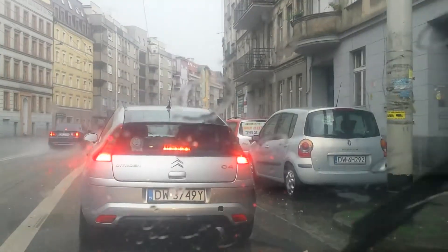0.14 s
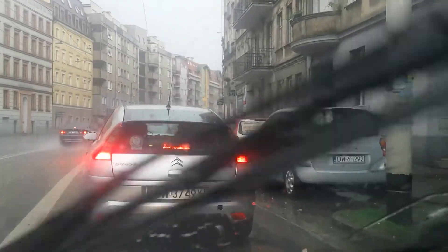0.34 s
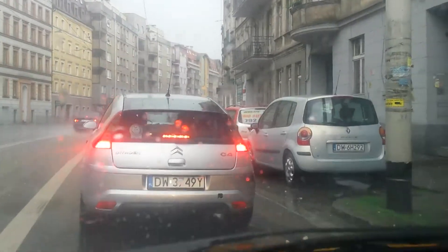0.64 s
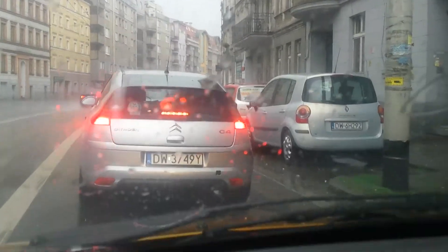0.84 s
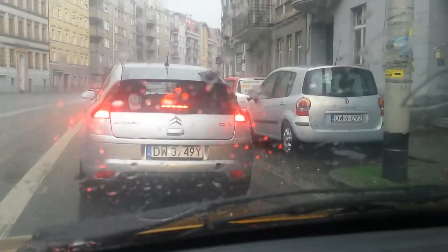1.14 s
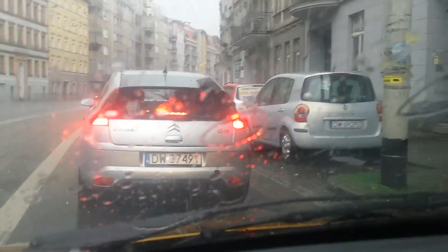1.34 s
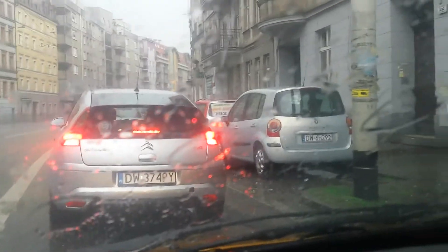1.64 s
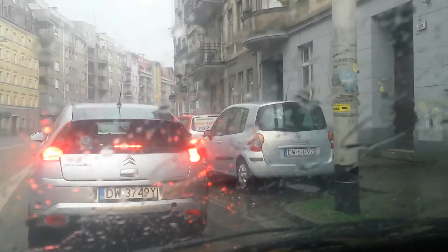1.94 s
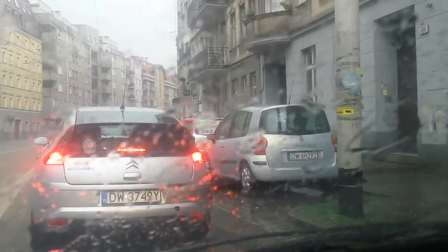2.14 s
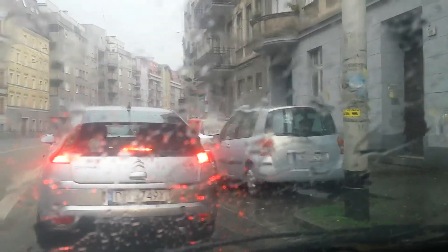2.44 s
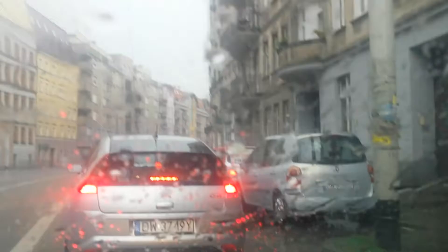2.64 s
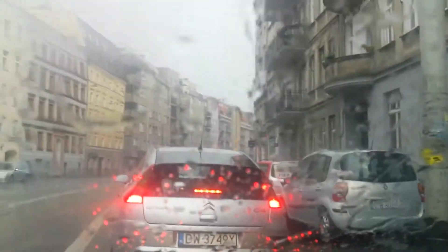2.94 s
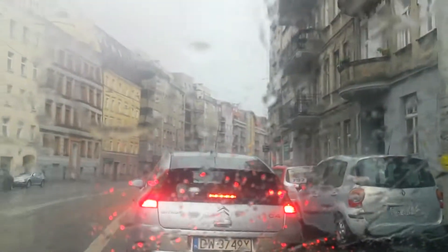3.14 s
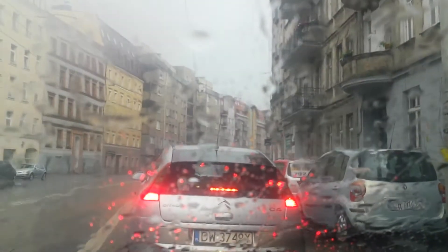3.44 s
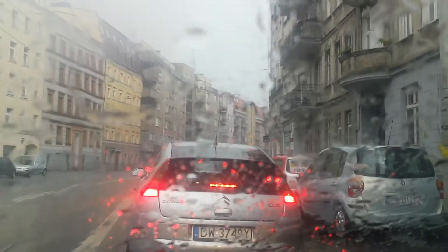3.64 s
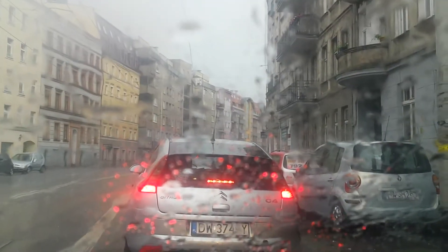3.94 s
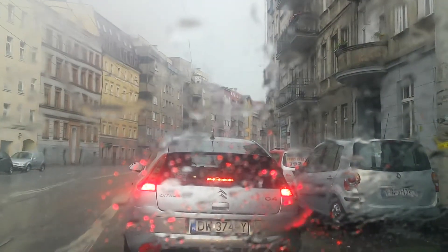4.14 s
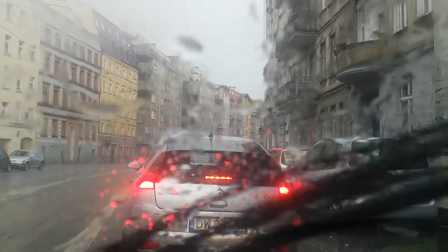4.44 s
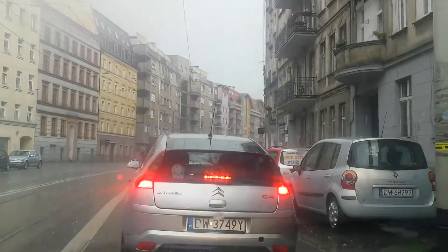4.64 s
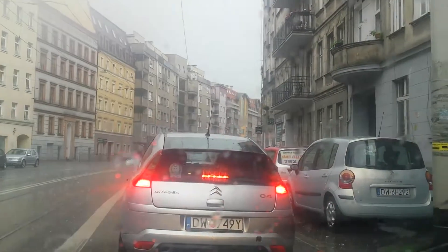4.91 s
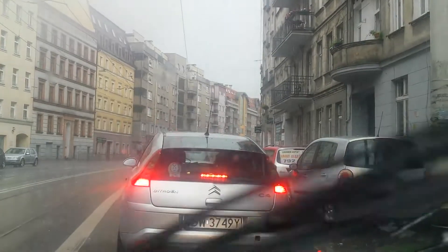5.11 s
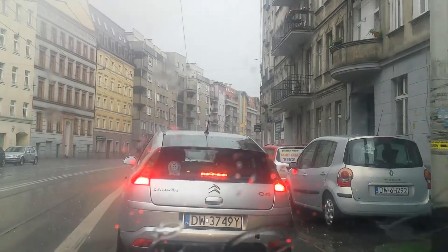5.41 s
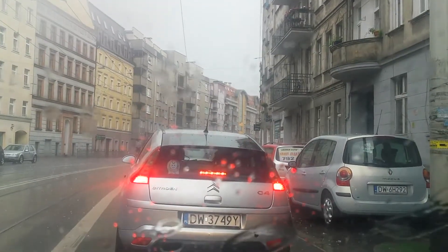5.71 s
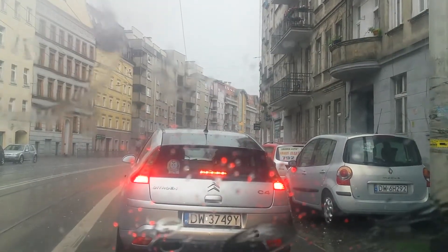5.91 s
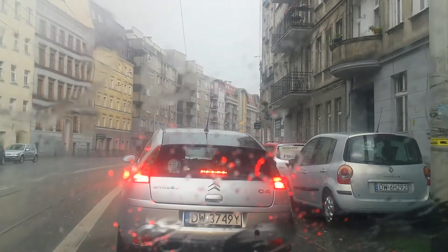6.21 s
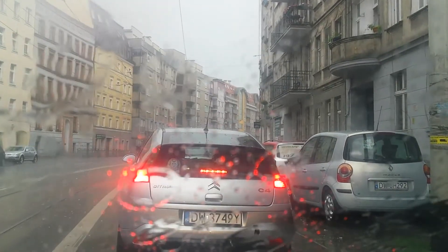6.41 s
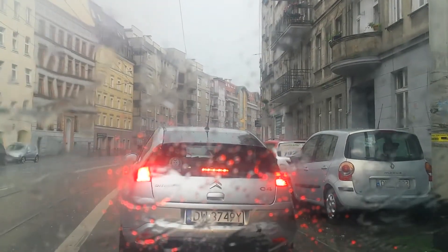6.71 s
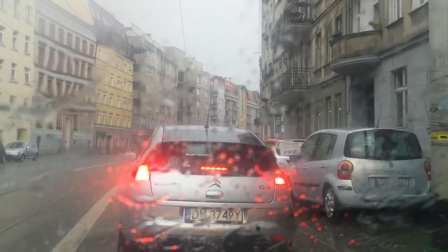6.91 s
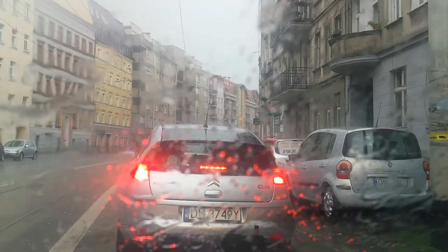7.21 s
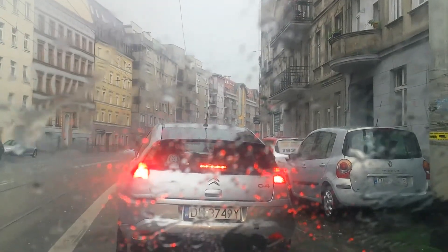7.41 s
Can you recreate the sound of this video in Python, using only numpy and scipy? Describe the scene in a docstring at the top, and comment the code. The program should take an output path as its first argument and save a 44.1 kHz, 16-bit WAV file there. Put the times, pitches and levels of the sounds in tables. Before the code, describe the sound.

Inside an idling car, steady rain hisses on the glass while hailstones crack and knock sharply on windscreen and roof, with occasional soft wiper thumps.

```python
"""Rain and hail on a car that idles in a queue, heard from inside the cabin for about 7.5 seconds.
From the start, shaped noise hisses and patters as rain, and a few low sine tones hum as the engine.
Hail begins at once: each stone is a spray of noise, a knock on the windscreen and a ringing roof.
A wiper thumps, a low decaying tone, just after the start; two more thumps come after 4.7 s.
The rain weakens and swells several times, and is strong again from about 6.8 s to the end."""
import sys
import numpy as np
from scipy import signal
from scipy.fft import rfft, irfft, next_fast_len
from scipy.io import wavfile
from scipy.ndimage import uniform_filter1d, map_coordinates

SR = 44100
rng = np.random.default_rng(int(sys.argv[2]) if len(sys.argv) > 2 else 0)


def output_pcm(signal):
    """Save a mono or channel-first signal as 16-bit PCM at the path in sys.argv[1].

    Samples are clipped to [-1, 1] before scaling.
    """
    pcm = np.clip(np.atleast_2d(signal).T, -1, 1) * 32767
    wavfile.write(sys.argv[1], SR, np.round(pcm).astype(np.int16))


N = 333396


def amp(db):
    """Turn decibels into a gain."""
    return 10 ** (np.asarray(db) / 20)


def unit(x):
    """Scale x to an rms of 1."""
    return x / np.sqrt(np.mean(x ** 2) + 1e-20)


def burst(x):
    """Scale a short sound to the energy of 20 ms at rms 1, whatever its length."""
    return unit(x) * np.sqrt(.02 * SR / x.shape[-1])


def along(points, hz):
    """Read a curve of (Hz, value) points on a logarithmic pitch axis."""
    point_hz, value = np.transpose(points)
    return np.interp(np.log(hz + 1), np.log(point_hz + 1), value)


def curves(rows):
    """Turn each column after the time into one value per sample."""
    seconds, *columns = np.transpose(rows)
    return [np.interp(np.arange(N) / SR, seconds, column) for column in columns]


def wobble(rate):
    """Draw a smooth random curve with this many random points a second."""
    points = rng.standard_normal(int(N * rate / SR) + 4)
    return map_coordinates(points, [np.arange(N) * rate / SR])


def add(track, s, sound):
    """Mix a sound into the track from time s in seconds."""
    part = track[:, max(0, round(s * SR)):][:, :sound.shape[-1]]
    part += sound[:, :part.shape[-1]]


def panned(x, left_db):
    """Make left louder than right by left_db, half on each side."""
    return x * amp(np.array([[.5], [-.5]]) * left_db)


# How alike the two ears are. Each row: pitch in Hz, likeness (1 = same, 0 = unrelated).
LIKENESS = [(100, 1), (250, 0.92), (500, 0.82), (1000, 0.031), (10000, 0.096)]
# Which side is louder. Each row: pitch in Hz, left level minus right level in dB.
LEFT_RIGHT = [(60, -3.5), (160, -3.5), (600, -2.5), (1800, -3.5), (3500, 0.5), (6300, 0.6), (11000, -10)]


def coloured(pair, spectrum, bright_db=0, ripple_db=0):
    """Filter two unrelated signals into left and right; no sound comes before its cause."""
    n = pair.shape[-1]
    m = 2 * next_fast_len(n // 2 + 1024)
    hz = np.fft.rfftfreq(m, 1 / SR)
    tilt = bright_db * along([(2800, -0.47), (7500, 0.47)], hz)
    # each spot on the car favours its own resonances
    ripple = ripple_db * map_coordinates(rng.standard_normal(128), [np.sqrt(hz / 2)])
    gain = amp(along(spectrum, hz) + tilt + ripple)
    # folding the cepstrum forward in time makes the filter start promptly (minimum phase)
    cepstrum = irfft(np.log(gain))
    cepstrum[1:m // 2] *= 2
    cepstrum[m // 2 + 1:] = 0
    colour = np.exp(rfft(cepstrum))
    # the shared middle and the opposed side part are mixed to give the wanted likeness
    turn = np.arccos(np.clip(along(LIKENESS, hz), -1, 1)) / 2
    mid, side = rfft(pair, m) * colour * [np.cos(turn), np.sin(turn)]
    ears = np.array([mid + side, mid - side])
    return irfft(panned(ears, along(LEFT_RIGHT, hz)))[:, :n]


# Tones of the idling car. Each row: pitch in Hz, rms level in dB before wavering and panning.
IDLE_TONES = [(28.4, -53.5), (50.5, -60), (56.7, -47)]


def idle(waver_db=1.5):
    """Steady low tones of the idling car hum together, wavering slowly in level and phase."""
    t = np.arange(N) / SR
    tones = np.zeros(N)
    for hz, db in IDLE_TONES:
        level = amp(db + waver_db * wobble(1.97))
        tones += level * np.sin(2 * np.pi * hz * t + 0.069 * wobble(1.26))
    return panned(np.sqrt(2) * tones, -1.7)  # a sine of peak sqrt(2) has rms 1


def patter(flutter_db):
    """Noise of countless small drops, fluttering in strength."""
    return amp(flutter_db * (wobble(25) + wobble(120))) * rng.standard_normal((2, N))


# Strength of the rainfall. Each row: time in seconds, hiss on the glass in dB,
# drumming on the panels in dB; both before the trims in rain().
RAINFALL = [(0.0, -49.5, -35.5), (0.46, -47.5, -36.5), (0.67, -53.5, -40.5), (1.03, -50, -45),
            (1.58, -54, -44), (3.14, -47.5, -38.5), (3.41, -54, -44), (4.15, -56, -44.5), (5.35, -49, -38),
            (5.91, -53.5, -43.5), (6.44, -51.5, -40.5), (6.8, -44, -35), (7.56, -44.5, -36.5)]
# Colour of the hiss. Each row: pitch in Hz, relative level in dB per Hz.
HISS_COLOUR = [(800, -32), (1300, -52), (2000, -13.5), (2700, -5), (4500, -5.5), (6500, -8), (8500, -19),
               (11800, -30.5), (13000, -46)]
# Colour of the windscreen, also used for the panels. Each row: pitch in Hz, relative dB per Hz.
GLASS_COLOUR = [(150, -20.5), (330, -7.5), (470, -2.5), (540, -1.5), (630, 5), (700, -0.5), (760, 0.5),
                (900, -5), (1070, 1.5), (1220, -6.5), (1400, -6.5), (1650, -10.5), (2200, -15.5),
                (5000, -56.5)]
# Colour of the cabin's rumble. Each row: pitch in Hz, relative level in dB per Hz.
CABIN_COLOUR = [(15, -46), (35, -15), (70, 0), (100, -10.5), (140, 5), (165, -3.5), (190, 2), (250, -1.5),
                (330, -7), (500, -14), (1200, -75.5)]


def rain(hiss_db=3.4, drum_db=1, rumble_db=-39, rumble_grows=0.94):
    """Drops hiss on the glass and drum on the panels; the cabin's rumble follows the drumming."""
    hiss, drum = curves(RAINFALL)
    rumble = rumble_db + rumble_grows * (drum - drum.mean())
    fizz = unit(coloured(patter(flutter_db=4.0), HISS_COLOUR))
    panels = unit(coloured(patter(flutter_db=2.84), GLASS_COLOUR))
    cabin = unit(coloured(patter(flutter_db=1.5), CABIN_COLOUR))
    return amp(hiss + hiss_db) * fizz + amp(drum + drum_db) * panels + amp(rumble) * cabin


# Moments when the wipers turn round. Each row: start in seconds, level in dB before panning.
WIPER_TURNS = [(0.079, -22.5), (4.786, -21.5), (5.33, -36)]


def wipers(thump_hz=123, rise_s=0.032):
    """The rubber blades flip over with a soft, low thump that swells and fades."""
    out, t = np.zeros((2, N)), np.arange(SR // 4) / SR
    swell = (t / rise_s * np.exp(1 - t / rise_s)) ** 3  # peaks at rise_s
    thump = np.sin(2 * np.pi * thump_hz * t) * swell
    for s, db in WIPER_TURNS:
        add(out, s, amp(db) * panned(thump, -4))
    return out


def strike(t, rise, t60):
    """Envelope that builds while the ice crushes, then falls by 60 dB in t60 seconds."""
    rise = max(rise, 1e-4)
    return np.minimum(t / rise, 1) * amp(-60 * np.maximum(t - rise, 0) / t60)


# Colour of the spray. Each row: pitch in Hz, relative level in dB per Hz.
SPRAY_COLOUR = [(500, -13.5), (1300, -6), (1900, -6.5), (2500, -0.5), (3400, -1.5), (5200, 0),
                (5650, -10.5), (6300, -0.5), (7200, -5.5), (8500, -12.5), (11800, -22), (12500, -16)]


def shatter(t, crush, t60, bright_db, crack=0.099, grain_db=3.5, clump_db=2, tail_db=-22, tail_t60=0.13):
    """Ice or water cracks and scatters in clumps of fragments; the cabin prolongs it a little."""
    fine, coarse = rng.standard_normal((2, len(t)))
    grains = grain_db * unit(uniform_filter1d(fine, size=30))
    clumps = clump_db * unit(uniform_filter1d(coarse, size=220))
    fragments = amp(grains + clumps)
    snap = crack * np.exp(-((t - crush) / 0.00037) ** 2)
    tail = amp(tail_db) * strike(t, crush, tail_t60)
    splash = snap + strike(t, crush, t60) + tail
    noise = rng.standard_normal((2, len(t))) * fragments * splash
    return burst(coloured(noise, SPRAY_COLOUR, bright_db, ripple_db=2.5))


def drops(drop_db=-49, spread_db=2.0, bright_db=3, t60=0.091, count=260):
    """Raindrops of all sizes splash on the windscreen at random times."""
    out, t = np.zeros((2, N)), np.arange(SR // 14) / SR
    hiss = curves(RAINFALL)[0]
    heavier_db = hiss - hiss.mean()  # the drops grow as the rain swells
    chances = rng.random((count, 2))
    sizes = rng.standard_normal((count, 2)).clip(-2, 2)
    for (when, softness), (bright, loud) in zip(chances, sizes):
        tick = shatter(t, 0.0016 + 0.0085 * softness, t60, bright_db + 3 * bright)
        level_db = drop_db + heavier_db[int(when * N)] + spread_db * loud
        add(out, when * N / SR, amp(level_db) * tick)
    return out


# the glass rings for KNOCK_T60_S under a stone that barely booms, longer under a heavier one
FAINT_BOOM_DB, KNOCK_T60_S, RING_DB_PER_DB = -58, .13, 0.04


def knock_on_glass(t, crush, boom):
    """A blow of noise swells and dies in the colour of the windscreen."""
    weight_db = boom - FAINT_BOOM_DB
    t60 = KNOCK_T60_S * amp(RING_DB_PER_DB * weight_db)
    blow = rng.standard_normal((2, len(t))) * strike(t, crush + 0.0019, t60)
    return burst(coloured(blow, GLASS_COLOUR, ripple_db=2.5))


# Ringing pitches (modes) of the roof panel. Each row: pitch in Hz, relative level in dB before
# the focus around BOOM_HZ, time to fall by 60 dB in seconds.
ROOF_MODES = [(93, -4, 0.15), (123, -7, 0.68), (139.1, -2.5, 0.54), (165, 2.5, 0.19), (187.4, 4, 0.27),
              (219.5, 1.5, 0.23), (241.7, -2, 0.62), (257.8, 2.5, 0.33), (285.2, 1.5, 0.36)]
BOOM_HZ = 182  # the roof answers most near this pitch


def boom_of_roof(t, crush, focus_db, width):
    """The roof modes ring as decaying sines, with new strengths and phases for each stone."""
    hz, mode_db, mode_t60 = np.transpose(ROOF_MODES)[:, :, None]
    # the place of impact sets the strengths and phases
    loud, phase, spread = rng.standard_normal((3, len(ROOF_MODES), 1))
    focus = focus_db * np.log2(hz / BOOM_HZ) ** 2
    strength = amp(mode_db - focus + 2 * loud - 60 * t / mode_t60)
    apart = width * spread * (hz / hz.max()) ** 2  # higher modes differ more between the microphones
    turns = hz * t + phase
    roof = np.array([(strength * np.sin(2 * np.pi * turns + side * apart)).sum(0) for side in (1, -1)])
    return panned(burst(roof * np.minimum(t / (crush + 0.012), 1)), -3.0)


# The hailstones. Each row: start in seconds, spray in dB, brightness of the spray in dB,
# windscreen knock in dB, roof boom in dB, crush time in seconds.
# The levels and the brightness are before the trims in hail().
HAILSTONES = [(0.037, -18, -0.5, -18, -18.5, 0.0018), (0.2647, -27, 3, -28.5, -25, 0.0093),
              (.382, -30.5, -4.5, -26, -55, 0.00093), (.5154, -18, -3, -22, -24, 0.0031),
              (0.5725, -19, -1.5, -35.5, -26, 0.0033), (0.7955, -9.5, -14.5, -17, -11.5, 0.0013),
              (0.888, -33.5, 2, -46, -53, 0.0031), (0.922, -29.5, 0, -50, -52, 0.01),
              (.9486, -24.5, 3, -55, -53, 0.0013), (.981, -14.5, 12, -29.5, -30.5, 0.0047),
              (1.0265, -27.5, 1, -50, -52, 0.0057), (1.0907, -32, -5, -25.5, -28.5, 0.0025),
              (1.19, -33, -2, -39, -52, 0.0078), (1.2323, -23, 10, -52, -44, 0.0027),
              (1.256, -30.5, -3, -54, -49, 0.0061), (1.365, -21, 4, -22.5, -23.5, 0.0058),
              (1.8124, -26.5, 5, -29, -27.5, 0.0058), (1.888, -31, 4, -43, -44, 0.0032),
              (1.9889, -29, -9, -16, -6.5, 0.0016), (2.0483, -27.5, 13, -32.5, -36, 0.0029),
              (2.167, -22.5, -7, -18.5, -31, 0.0077), (2.2855, -26, 3, -35.5, -36, 0.014),
              (2.331, -19, -1, -18, -17, 0.013), (2.4101, -30.5, -13, -22, -24.5, 0.011),
              (2.5783, -26.5, -9.5, -21.5, -23.5, 0.0075), (2.8081, -23, 3, -23, -25, 0.005),
              (2.8792, -20.5, 8.5, -29, -44, 0.0014), (2.9766, -22.5, -6, -22, -25.5, 0.0046),
              (3.0896, -24, -1.5, -34.5, -26, 0.019), (3.2061, -28.5, 4, -27, -29.5, 0.0031),
              (3.2814, -22, 3.5, -38, -31, 0.00035), (3.3208, -32.5, -5, -29, -30, .0035),
              (3.6022, -34, 1, -32.5, -42, 0.014), (3.8263, -32, -17, -30.5, -32, 0.00067),
              (3.9841, -11, -4.5, -30, -26.5, 0.0017), (4.3103, -32.5, 7, -26, -32, 0.0038),
              (4.34, -24, -3, -29.5, -50, 0.002), (4.362, -22.5, -6, -23.5, -23, 0.0019),
              (4.6017, -26.5, -10.5, -49, -47, 0.00047), (4.8288, -32, 7.5, -55, -33, 0.0062),
              (4.9017, -25.5, 9, -29.5, -35, 0.0049), (5.0544, -16, 1, -21.5, -52, 0.0088),
              (5.105, -22, 2.5, -50, -31, 0.00084), (5.358, -26.5, -17, -28.5, -19, 0.0025),
              (5.412, -25, -8, -17.5, -22.5, 0.0017), (5.473, -15, -1, -15.5, -20, 0.005),
              (5.6327, -25, 6.5, -26, -33, 0.0058), (5.8623, -22.5, 1.5, -35, -34, 0.0097),
              (5.921, -26.5, 6, -35, -43, 0.0078), (6.0998, -30, 9, -21.5, -23, 0.0033),
              (6.23, -34, 2, -42.5, -55, 0.011), (6.3711, -28, -3.5, -27.5, -40, 0.003),
              (6.436, -18, -1, -13, -12.5, 0.0058), (6.6086, -22, -3.5, -18.5, -30, .007),
              (6.6992, -16.5, 7, -26, -20, 0.0063), (7.0106, -21.5, 2.5, -19.5, -18, 0.0088),
              (7.2984, -23.5, -2, -58, -32, 0.00067), (7.4115, -26.5, -3, -36, -34, 0.0054),
              (7.493, -21, 0.5, -22.5, -27, 0.0033), (7.5167, -21, 5.5, -25.5, -29, 0.0088)]
# a spray with the usual crush time dies in SPRAY_T60_S; slushy stones crush slowly and linger
USUAL_CRUSH_S, SPRAY_T60_S, LINGER_POWER = 0.0047, 0.064, 0.24


def hail(spray_db=0, knock_db=0, boom_db=-3, bright_db=4.5, focus_db=10, width=0.5):
    """Each stone bursts, then knocks the glass and rings the roof about a millisecond later."""
    out, t = np.zeros((2, N)), np.arange(SR // 4) / SR
    for s, spray, bright, knock, boom, crush in HAILSTONES:
        spray_t60 = SPRAY_T60_S * (crush / USUAL_CRUSH_S) ** LINGER_POWER
        ice = shatter(t, crush, spray_t60, bright + bright_db)
        add(out, s, amp(spray + spray_db) * ice)
        add(out, s + 0.00098, amp(knock + knock_db) * knock_on_glass(t, crush, boom))
        add(out, s + 0.0012, amp(boom + boom_db) * boom_of_roof(t, crush, focus_db, width))
    return out


def scene(lag=.00022):
    """Everything heard in the cabin; it reaches the left microphone lag seconds earlier."""
    left, right = idle() + rain() + wipers() + drops() + hail()
    return np.array([left, np.pad(right, (round(lag * SR), 0))[:N]])


TOP_HZ = 12050  # the treble fades out around this pitch


def record(dry, thud=5.9):
    """The hardest stones overload the microphone; the treble ends just above TOP_HZ."""
    excess = np.maximum(np.abs(dry) - .9, 0).mean(0)
    # overload pushes the signal to one side, which comes out as a low thud
    low_band = signal.butter(2, [45, 150], "band", fs=SR, output="sos")
    offset = signal.sosfilt(low_band, excess)
    clipped = np.clip(dry - thud * offset, -.95, .95)
    m = next_fast_len(N + SR // 2)
    band = np.clip((TOP_HZ - np.fft.rfftfreq(m, 1 / SR)) / 400 + .7, 0, 1)
    return irfft(rfft(clipped, m) * band, m)[:, :N]


dry = scene()
out = record(dry)
output_pcm(out)
```